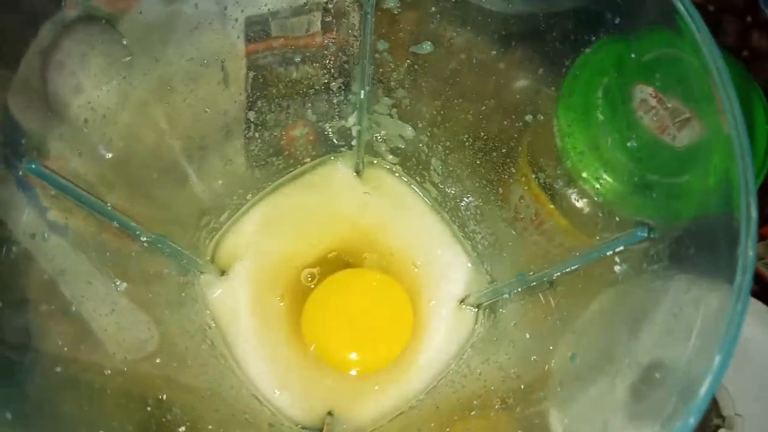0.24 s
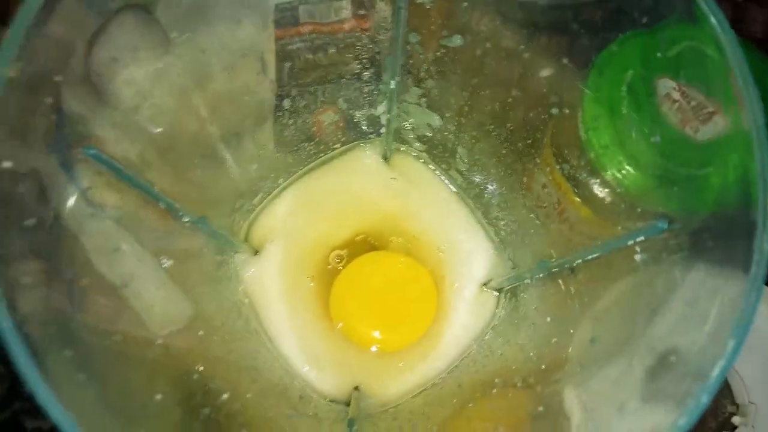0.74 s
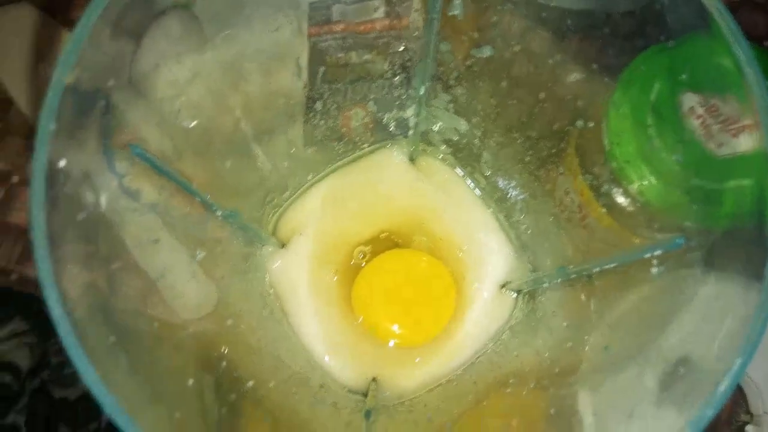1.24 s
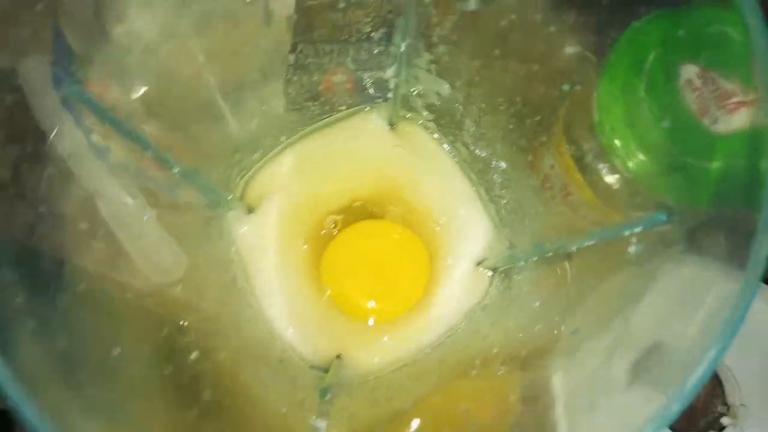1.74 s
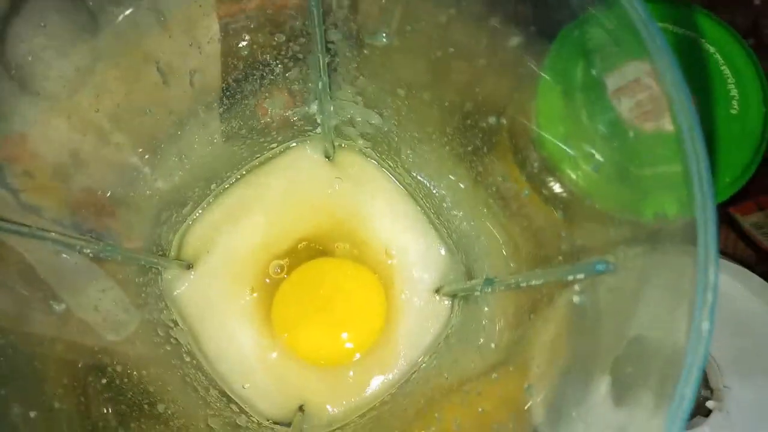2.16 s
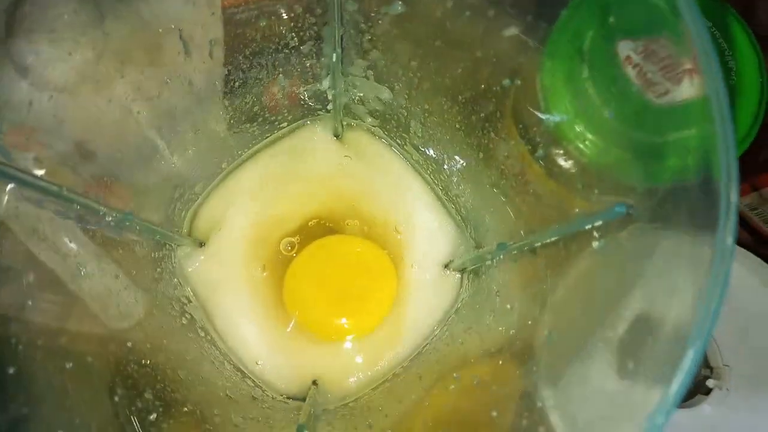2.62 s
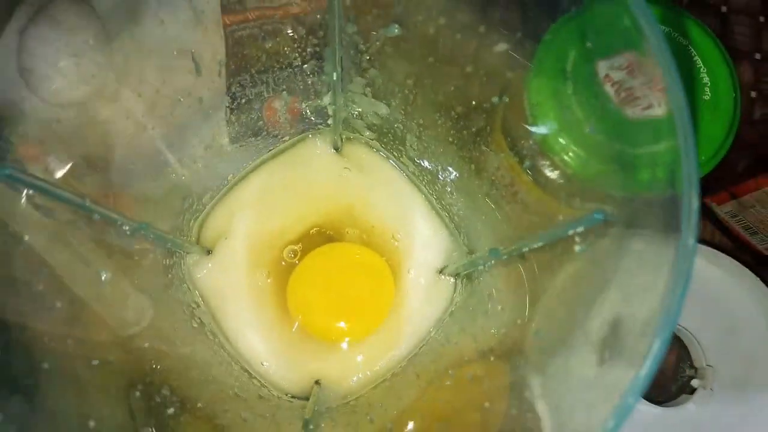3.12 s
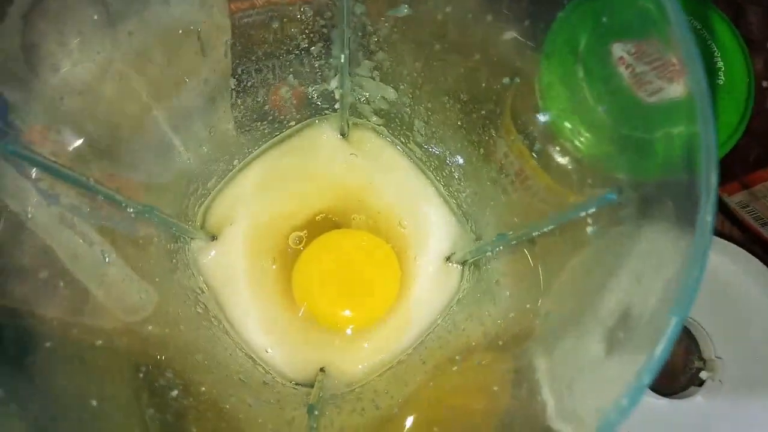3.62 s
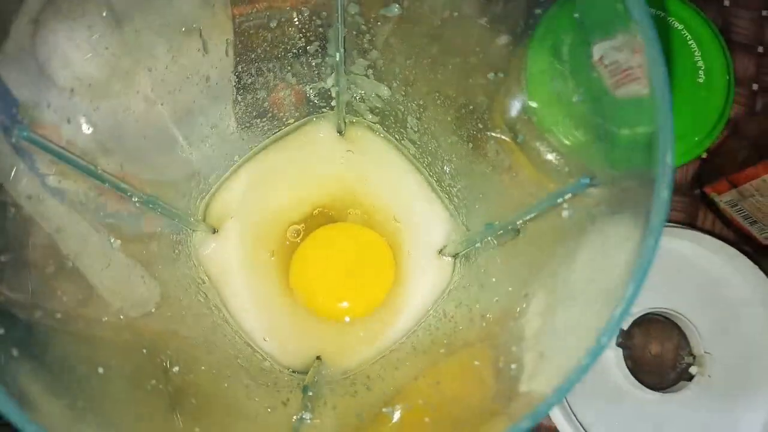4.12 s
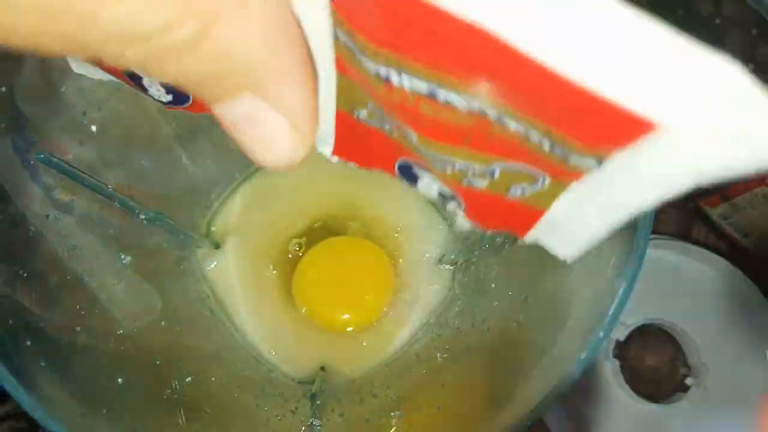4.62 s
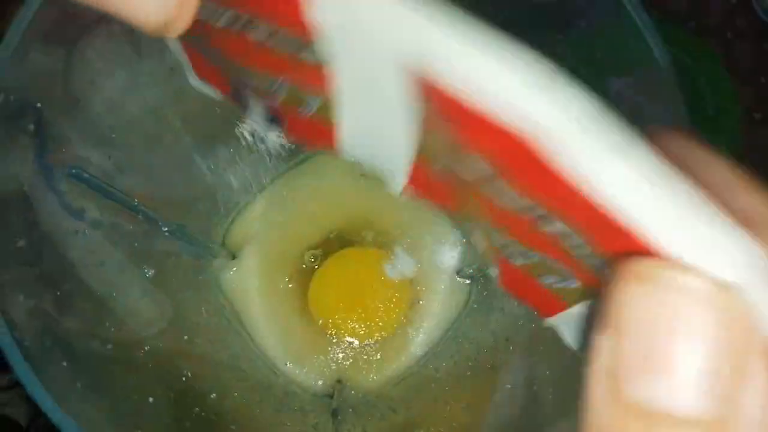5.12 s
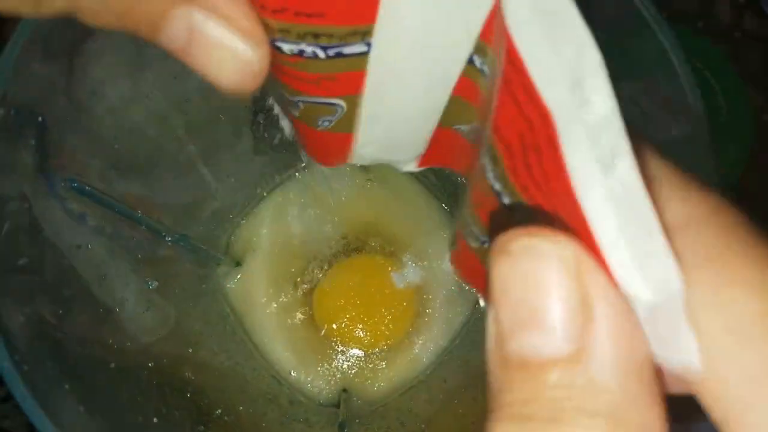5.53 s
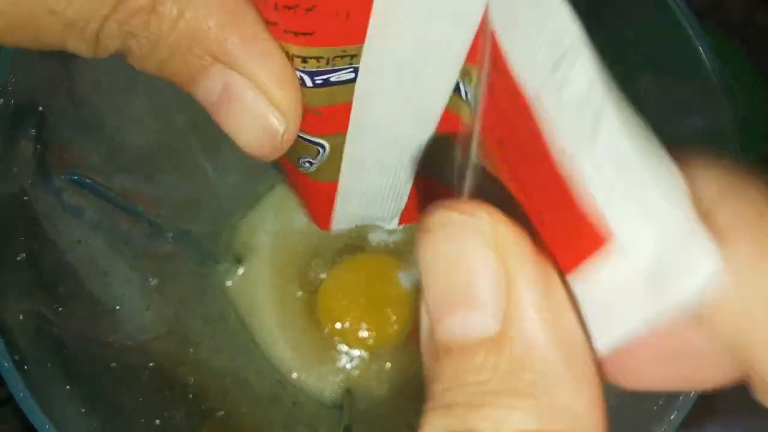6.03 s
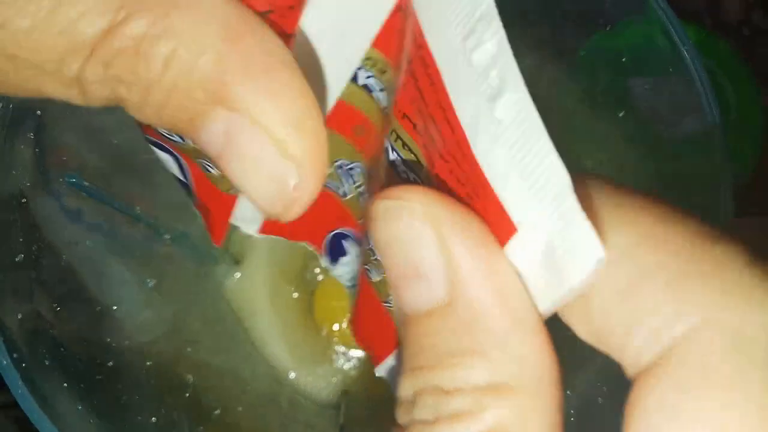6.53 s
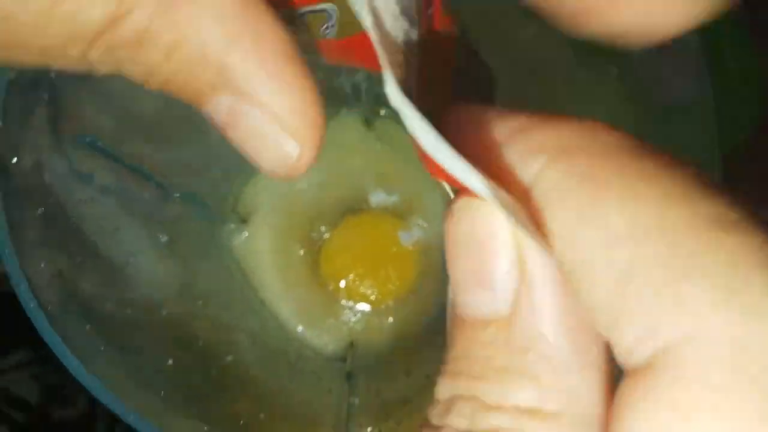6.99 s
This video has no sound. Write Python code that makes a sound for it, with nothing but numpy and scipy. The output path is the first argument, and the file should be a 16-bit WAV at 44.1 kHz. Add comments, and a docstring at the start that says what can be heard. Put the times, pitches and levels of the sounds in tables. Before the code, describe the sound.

Bright dry paper flicks with a slight grainy powder swish come in irregular pairs, then stop. A quiet room with wavering low hum and barely audible soft thumps remains. A few single crinkles follow, then fast overlapping snaps, rips and rustles, louder than before, with a slight hollow colour from the bowl beneath. Handheld phone at close range, short kitchen reflections, limited treble.

```python
"""A small paper sachet of powder is shaken, torn and crinkled by hand near a phone, later over a tall jug.
Rustle: fibre cracks and grain noise, levelled by hand strokes, drive the sheet and its hollows.
Snaps: short bursts of cracks, each with its own treble and pocket pitch. Taps: noise in one narrow resonance.
The pocket rings along, with the hollow of the hands and then the jug. Hard kitchen walls answer.
Soft low thumps pass through the counter; an appliance hums as wavering sines over quiet broad noise."""
import sys
import numpy as np
from scipy import signal
from scipy.fft import rfft, irfft, next_fast_len
from scipy.io import wavfile
from scipy.ndimage import uniform_filter1d, map_coordinates

SR = 44100
rng = np.random.default_rng(int(sys.argv[2]) if len(sys.argv) > 2 else 0)


def voltage_ratio(level):
    """Linear amplitude factor for a level in decibels (scalar or array-like)."""
    return 10 ** (np.asarray(level, float) / 20)


def generate_wav(sig):
    """Save sig (samples, or channels by samples) to the path in sys.argv[1] as 16-bit PCM at SR."""
    pcm = np.round(np.clip(np.atleast_2d(sig).T, -1, 1) * 32767).astype(np.int16)
    wavfile.write(sys.argv[1], SR, pcm)


N = 320166  # samples

# hand strokes that shake, tear or crumple the sheet:
# (peak time [s], peak level [dB], rise [s], fall of the sheet [s], pocket over sheet [dB])
STROKES = [(0.044, -40, 0.076, 0.29, -6.5), (0.142, -27.5, 0.018, 0.1, -12.5), (.33, -43, 0.11, 0.16, -6),
           (.493, -41, .03, 0.17, -19), (.593, -34, 0.1, 0.081, -7.5), (.808, -53.5, 0.14, 0.14, -10),
           (.938, -46.5, 0.032, 0.12, 3), (.982, -22.5, 0.017, 0.061, -17), (1.147, -50.5, 0.24, 0.19, -9),
           (1.39, -22.5, .004, 0.11, -15.5), (1.431, -26, 0.028, 0.077, -5),
           (1.796, -38, .014, 0.18, -13.5), (1.968, -41, 0.044, .15, -15.5), (2.042, -37, 0.034, 0.39, -23),
           (2.399, -23, 0.02, .08, -32.5), (2.434, -26, 0.051, 0.071, -16.5), (2.763, -59, .02, 0.174, -6),
           (2.846, -56, 0.18, 0.07, -9), (2.943, -66, .1, 0.098, -.5), (3.185, -64, 0.085, 0.31, -4.5),
           (4.043, -68, 0.36, 0.1, 6.5), (4.302, -40, .1, 1, -33), (4.467, -38, 0.18, 0.083, -22),
           (4.727, -30, 0.016, 0.16, -12.5), (4.928, -41.5, 0.13, .27, -13.5),
           (5.076, -38, 0.066, 0.39, -17), (5.178, -34.5, .012, 0.065, -19),
           (5.239, -30, 0.026, 0.044, -5.5), (5.39, -44, 0.63, 0.32, -10), (5.498, -43, .06, .08, -4.5),
           (5.569, -31, .024, .065, -14), (5.669, -36.5, .25, 0.13, -14.5),
           (5.805, -32.5, 0.083, 0.075, -7), (5.897, -37.5, 0.094, 0.11, -7),
           (6.02, -27.5, .006, 0.13, -19.5), (6.05, -30, 0.034, 0.14, -11), (6.213, -28, 0.22, 0.088, -8),
           (6.342, -34.5, .07, 0.21, -12), (6.468, -33, 0.0075, 0.046, -13),
           (6.495, -21.5, 0.031, 0.098, -15), (6.723, -24.5, 0.031, .13, -13),
           (6.843, -30, 0.033, 0.056, -10.5), (6.9, -65, .05, 0.079, -33),
           (7.058, -23.5, 0.023, 0.069, -10), (7.26, -50, 0.088, .1, -6.5)]
# how the sheet is worked: (time [s], roughness [0 powder slides smoothly, 1 paper crackles and rips])
ROUGHNESS = [(0, 0.51), (1.3, 0.74), (1.5, 0.4), (1.8, 0.22), (2.35, 0.27), (2.45, 0.34), (4.1, 0.11),
             (4.65, 0.045), (5.1, 0.66), (5.5, 0.77), (7.26, 1)]
# crease snaps: (time [s], level [dB], pocket over sheet [dB], pocket pitch [Hz])
SNAPS = [(0.0136, -28, -3.5, 1943), (0.0297, -16.5, -7, 2470), (0.1067, -21.5, -17, 2420),
         (0.1294, -13, -27.5, 1940), (0.2304, -34.5, -24, 2180), (0.2784, -19, -4, 3220),
         (0.3331, -25, -6, 1530), (0.412, -38, 5, 1920), (0.4805, -28, -23, 1890),
         (0.4928, -27.5, -2.5, 1945), (0.5357, -24.5, -9, 1920), (0.551, -29.5, -17, 2137),
         (0.5787, -21, 1.5, 1880), (0.7342, -39, -17.5, 2300), (0.8094, -35.5, -14, 2346),
         (0.8927, -47.5, 10, 2370), (0.93, -28, 2.5, 1999), (0.9732, -11, -12.5, 2290),
         (1.0781, -21.5, -25, 2580), (1.1258, -23, -9.5, 2360), (1.1574, -25, -19.5, 2380),
         (1.3068, -42.5, -17, 1550), (1.4189, -15, -12, 2130), (1.6656, -38.5, -35, 3060),
         (1.7841, -28, -29, 2330), (1.7957, -19.5, -25, 3200), (1.925, -31, -29, 1550),
         (1.949, -34.5, -26.5, 2400), (1.9718, -23.5, -18, 2370), (2.0336, -18, -26, 2350),
         (2.099, -24, -25, 2700), (2.123, -25, -9.5, 2650), (2.2417, -31.5, -40, 2873),
         (2.4698, -16.5, -18.5, 1987), (2.5511, -39, -16, 2390), (2.7536, -40.5, -7.5, 2880),
         (2.7906, -38, -20, 2570), (2.8275, -42.5, -17, 2350), (2.9418, -43, 1.5, 2440),
         (3.1276, -56, 3, 2570), (3.1896, -41, -25, 2596), (3.3064, -49, -18, 1740),
         (3.6246, -46, -8, 2860), (3.8863, -47.5, 2, 2400), (4.0285, -57, 10, 1640), (4.1007, -57, 8, 1710),
         (4.2518, -42, -30, 3030), (4.468, -25.5, -19, 2380), (4.7195, -14, -7, 2900),
         (4.9277, -21, -20, 2120), (4.9687, -35.5, 9.5, 2780), (5.0603, -31.5, -7.5, 3030),
         (5.1711, -24.5, -6, 1970), (5.2284, -25, -3, 2650), (5.3193, -20.5, -12, 2590),
         (5.376, -20.5, -7.5, 1990), (5.4038, -15, -7, 1970), (5.4288, -19, -9, 1920),
         (5.488, -28, -2, 1916), (5.4979, -20.5, -1.5, 2670), (5.5618, -8, -29, 2398),
         (5.6196, -17.5, -8, 1710), (5.6339, -8.5, -41, 1970), (5.6762, -15, -13, 1670),
         (5.7374, -22, -6.5, 3150), (5.7553, -22, -7.5, 2400), (5.7977, -17, -12, 2440),
         (5.8092, -13.5, -19, 2000), (5.8461, -20.5, -20, 2470), (5.8644, -23.5, -11, 2510),
         (5.8825, -10, -14, 2890), (6.0154, -15.5, -16, 2880), (6.0411, -6.5, -15.5, 1980),
         (6.0794, -6.5, -21, 1930), (6.113, -16, -9, 1630), (6.164, -8.5, -21, 2030),
         (6.2068, -12, -18, 2130), (6.2181, -10, -20, 3040), (6.3062, -15, -13.5, 2410),
         (6.3265, -23.5, -15, 1990), (6.3455, -11, -30, 1620), (6.3984, -23.5, -7, 1970),
         (6.4765, -6, -20, 2510), (6.4867, -8, -40, 1910), (6.4982, -16, -23, 2700),
         (6.6348, -28.5, -17, 1600), (6.6764, -21, -19, 2480), (6.7146, -13.5, -21, 2010),
         (6.7611, -11.5, -31, 2930), (6.7745, -12.5, -35, 2860), (6.8431, -11.5, -9.5, 2100),
         (7.0494, -12.5, -12.5, 2410), (7.0668, -11.5, -14, 2770), (7.2354, -25, -2.5, 2450)]
# finger scuffs and taps on one small hollow: (time [s], level before attack and decay [dB rms], pitch [Hz], t60 [s])
TAPS = [(.58, -39.5, 693, 0.082), (1.96, -53.5, 720, 0.18), (2.755, -64.5, 882.5, 0.55),
        (2.87, -60, 1550, .1), (2.949, -48, 2550, 0.12), (3.13, -64, 2647, 0.3),
        (3.891, -64.5, 2630, 0.353), (4.036, -57, 1600, 0.29), (4.095, -50, 1680, 0.12),
        (4.369, -53, 480, 0.11), (4.41, -59.5, 930, 0.34), (4.725, -50.5, 586, 0.32),
        (5.172, -37.5, 640, 0.068), (5.495, -33.5, 660, 0.065), (7.034, -34.5, 560, 0.13),
        (7.236, -22.5, 3430, 0.041)]
# crisp paper spectrum: (frequency [Hz], relative density [dB per Hz])
SHEET = [(1470, -31), (2500, -8.5), (3850, -1), (4210, 1.5), (6040, 5), (7700, -9.5), (8260, -15),
         (8390, -48.5), (10900, -78.5), (18500, -120)]
# air and walls of the sachet: (centre [Hz], width [Hz], relative level [dB])
POCKET = [(1600, 390, 5), (2155, 208, 9.5), (2510, 400, 3), (2900, 28, -1)]
# hollow of the hands: (centre [Hz], width [Hz], relative level [dB])
PALM = [(438, 120, -16), (744, 190, 4.5), (1050, 160, 6), (1200, 150, 6)]
# hollow jug: (centre [Hz], width [Hz], relative level [dB])
JUG = [(370, 310, -11), (480, 88, -14.5), (600.7, 83, 7.5), (715, 160, -9), (870, 96, -5)]
# kitchen decay: (frequency [Hz], t60 [s])
KITCHEN = [(400, 0.33), (2000, 0.2), (8000, 0.13)]
# hands nudge the counter: (time, 30 ms before the crest [s], peak level [dB])
THUMPS = [(0.199, -62), (0.499, -53.5), (1.618, -57), (1.949, -61), (2.599, -63), (3.349, -55),
          (3.448, -55.5), (5.981, -55)]
# appliance hum lines: (frequency [Hz], level [dB rms], waver [dB])
HUM = [(97, -67, 2), (101.5, -60, 1.5), (106.5, -70, 2), (171, -78, 2), (248, -83, 2), (345, -82, 1.5)]
# room noise spectrum: (frequency [Hz], relative density [dB per Hz])
AIR = [(15, -48), (30, -29.5), (52, -15), (110, -10), (200, -19), (400, -21.5), (720, -29), (1100, -33.5),
       (2500, -34.5), (5700, -34.5), (7600, -48), (8400, -61), (11000, -92)]

OVER_JUG_S = 4.6  # from here the sachet hangs over the jug
SWELL_DB = 20  # how far a stroke climbs in its rise and drops in its fall
RESTING_DB = -82.5  # the sachet held still
PALM_DB, JUG_DB = -10, -8.5  # rustle: near hollow over the pocket
POCKET_LINGER, HOLLOW_LINGER = 0.82, 1.14  # falls, as multiples of a stroke's
BRIGHT_HZ, BRIGHT_SPREAD_HZ = 5530, 895  # each snap's favourite treble
SNAP_SHEET_DB = -9.5  # sheet over a snap's level
SNAP_PALM_DB, SNAP_JUG_DB = -37.5, -24  # hollow over a snap's level, at pocket 0 dB
HOLLOW_FOLLOWS = 0.88  # dB of hollow per dB of pocket
AIR_DB, ECHO_DB = -66, -11.0
TOP_HZ = 7930


def rustle():
    """Sliding powder and clumped fibre cracks drive sheet, pocket and whichever hollow is near."""
    s, *_, pocket_db = np.transpose(STROKES)
    t = np.arange(N) / SR
    hollow_db = pocket_db + np.where(s < OVER_JUG_S, PALM_DB, JUG_DB)
    rough = np.clip(np.interp(t, *np.transpose(ROUGHNESS)), 0, 1)

    clumps_db = 4.0 * wobble(45) + 2.97 * wobble(170)
    cracks = unit(voltage_ratio(clumps_db) * fibres(N, 0.19, spread_db=2.5))
    powder = unit(filtered(rng.standard_normal(N), grain_hiss))
    crackle = np.sqrt(rough) * patchy(cracks, depth_db=3.0, bins=2, frames=25)
    slide = np.sqrt(1 - rough) * patchy(powder, depth_db=4.5, bins=2, frames=40)
    drive = crackle + slide

    sheet = unit(filtered(drive, paper)) * strokes(0 * s, 1)
    walls = unit(filtered(drive, pocket)) * strokes(pocket_db, POCKET_LINGER) * voltage_ratio(0.54 * wobble(39))
    in_palm = unit(filtered(drive, modes(PALM)))
    in_jug = unit(filtered(drive, jug))
    hollow = np.where(t < OVER_JUG_S, in_palm, in_jug)
    hollow = hollow * strokes(hollow_db, HOLLOW_LINGER) * voltage_ratio(0.92 * wobble(26))
    return sheet + walls + hollow


def strokes(over_db, linger):
    """Summed power of all strokes, as amplitude: each swells, peaks and fades steadily in dB."""
    s, db, rise, fall, _ = columns(STROKES)
    t = np.arange(0, N / SR + .01, .001)
    off_peak = np.where(t < s, (s - t) / np.abs(rise), (t - s) / np.abs(linger * fall))
    stroke = voltage_ratio(db + over_db[:, None] - SWELL_DB * off_peak)
    power = np.sum(stroke ** 2, 0) + voltage_ratio(RESTING_DB) ** 2
    return np.interp(np.arange(N) / SR, t, np.sqrt(power))


def fibres(shape, share, spread_db):
    """Tiny fibre cracks: a share of the instants fire, their strengths spread exponentially in dB."""
    fire = rng.random(shape) < share
    strength = voltage_ratio(spread_db * rng.exponential(size=shape))
    return unit(fire * rng.standard_normal(shape) * strength)


def grain_hiss(f):
    """Fine grains hiss high."""
    return 0.3 + 1 / (1 + (3800 / (f + 1)) ** 4)


def patchy(x, depth_db, bins, frames):
    """Patches of gain over pitch and time: the bent sheet favours narrow, drifting bands."""
    z = signal.stft(x, nperseg=256)[2]
    field = uniform_filter1d(rng.standard_normal(z.shape), bins, 0)
    field = uniform_filter1d(field, frames, 1)
    return signal.istft(z * voltage_ratio(depth_db * field / field.std()), nperseg=256)[1][:N]


def snaps():
    """A crease buckles as a few ms of cracks; each favours its own patch of treble and its own pocket pitch."""
    s, db, pocket_db, pocket_hz = columns(SNAPS)
    bright_hz = BRIGHT_HZ + BRIGHT_SPREAD_HZ * rng.standard_normal(s.shape)
    hollow_db = np.where(s < OVER_JUG_S, SNAP_PALM_DB, SNAP_JUG_DB) + HOLLOW_FOLLOWS * pocket_db

    t = np.arange(SR // 10) / SR
    crack = voltage_ratio(-60 * t / 0.02)
    settling = voltage_ratio(-10.5 - 60 * t / 0.082)
    shape = (1 - np.exp(-t / 0.001)) * (crack + settling)
    burst = shape * fibres((len(s), len(t)), .3, spread_db=-0.5)
    size = np.sqrt(np.mean(burst[:, :220] ** 2, -1, keepdims=True))  # rms of the first 5 ms

    def level(response):
        """Response scaled to rms 1 over frequency."""
        return response / np.sqrt(np.mean(np.abs(response) ** 2, -1, keepdims=True))

    def colour(f):
        """Sheet, squeezed pocket and near hollow, summed."""
        sheet = paper(f) * (0.75 + 0.9 * resonance(f, bright_hz, 500))
        squeezed = pocket(f) * (0.3 + resonance(f, pocket_hz, 300)) + .4 * resonance(f, pocket_hz, 170)
        hollow = np.where(s < OVER_JUG_S, modes(PALM)(f), jug(f))
        return (voltage_ratio(SNAP_SHEET_DB) * level(sheet) + voltage_ratio(pocket_db + SNAP_SHEET_DB) * level(squeezed)
                + voltage_ratio(hollow_db) * level(hollow))

    return placed(voltage_ratio(db) * filtered(burst / size, colour), s)


def taps():
    """Each touch rubs for a moment inside one narrow resonance."""
    s, db, hz, t60 = columns(TAPS)
    t = np.arange(SR // 4) / SR
    noise = rng.standard_normal((len(s), len(t)))
    rub = unit(filtered(noise, lambda f: resonance(f, hz, 90)))
    return placed(rub * voltage_ratio(db - 60 * t / t60) * (1 - np.exp(-t / 0.0014)), s)


def paper(f):
    """Spectrum of the crisp sheet."""
    return voltage_ratio(along(SHEET, f))


def pocket(f):
    """The pocket's modes, with little below the lowest."""
    return modes(POCKET)(f) * (1j * f / 1400) ** 2 / (1 + 1j * f / 1400) ** 2


def jug(f):
    """The jug's modes; its mouth passes little above or below them."""
    return modes(JUG)(f) * (1j * f / 400) ** 2 / (1 + 1j * f / 400) ** 2 / (1 + 1j * f / 900)


def modes(table):
    """Causal response of a few resonances, summed with alternating sign."""
    return lambda f: sum((-1) ** k * voltage_ratio(db) * resonance(f, hz, width_hz)
                         for k, (hz, width_hz, db) in enumerate(table))


def resonance(f, hz, width_hz):
    """Damped resonator response, 1 at its centre."""
    return 1j * f * width_hz / (hz * hz - f * f + 1j * f * width_hz)


def kitchen(x):
    """Hard walls answer; each frequency dies at its own speed."""
    hz, t, z = signal.stft(rng.standard_normal(SR // 2), SR, nperseg=256)
    decay = voltage_ratio(-60 * t / along(KITCHEN, hz)[:, None])
    tail = signal.istft(z * decay, SR, nperseg=256)[1]
    late = np.pad(x, (200, 0))  # 4.5 ms
    return signal.fftconvolve(late, tail / np.linalg.norm(tail))[:N]


def thumps():
    """Soft low pushes through the counter top: short sine swells."""
    out, t = np.zeros(N + SR), np.arange(SR // 5) / SR
    for s, db in THUMPS:
        push = np.hanning(len(t)) ** 2 * np.sin(2 * np.pi * rng.uniform(48, 62) * t)
        out[round((s - .07) * SR):][:len(t)] += voltage_ratio(db) * push
    return out[:N]


def room_tone():
    """Hum lines that waver in level and phase, over slowly breathing broad noise."""
    t = np.arange(N) / SR
    hum = 0
    for hz, db, waver_db in HUM:
        strength = np.sqrt(2) * voltage_ratio(db + waver_db * wobble(10))
        hum = hum + strength * np.sin(2 * np.pi * hz * t + 1.1 * wobble(2.2))
    air = unit(filtered(rng.standard_normal(N), lambda f: voltage_ratio(along(AIR, f))))
    return hum + voltage_ratio(AIR_DB + 0.94 * wobble(1.5)) * air


def columns(table):
    """Table columns, one row per event."""
    return (c[:, None] for c in np.transpose(table))


def placed(sounds, s):
    """Sounds summed at their start times s."""
    at = np.round(s * SR).astype(int) + np.arange(sounds.shape[1])
    return np.bincount(at.ravel(), sounds.ravel(), N + SR)[:N]


def unit(x):
    """Scaled to rms 1."""
    return x / np.sqrt(np.mean(x ** 2, -1, keepdims=True) + 1e-20)


def along(points, hz):
    """(Hz, value) points read on a log axis."""
    f, v = np.transpose(points)
    return np.interp(np.log(hz + 1), np.log(f + 1), v)


def wobble(rate_hz):
    """A smooth random curve, rate_hz knots a second."""
    knots = rng.standard_normal(int(N * rate_hz / SR) + 4)
    return map_coordinates(knots, [np.arange(N) * rate_hz / SR])


def filtered(x, response):
    """x through a complex response of frequency, along the last axis."""
    m = next_fast_len(x.shape[-1] + 4096)
    return irfft(rfft(x, m) * response(np.fft.rfftfreq(m, 1 / SR)), m)[..., :x.shape[-1]]


def scene():
    """Paper, its echo, the counter and the room."""
    paper_sound = rustle() + snaps() + taps()
    return (paper_sound + voltage_ratio(ECHO_DB) * kitchen(paper_sound) + thumps() + room_tone())[None]


def top_cut(x):
    """Nothing passes above the cut-off."""
    return signal.sosfilt(signal.butter(12, 8540, fs=SR, output="sos"), x)


def record(dry):
    """The phone rounds off the hardest peaks and keeps next to nothing above its band limit."""
    soft = dry / (1 + np.abs(dry / .5) ** 3) ** (1 / 3)
    narrow = filtered(soft, lambda f: 1 / (1 + (f / TOP_HZ) ** 60))
    return top_cut(narrow)


dry = scene()
out = record(dry)
generate_wav(out)
```